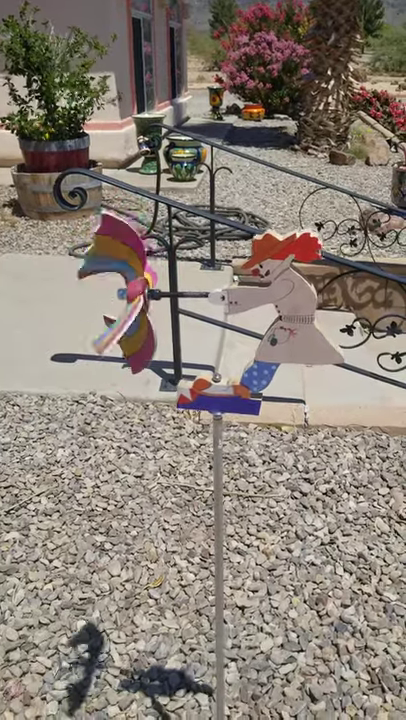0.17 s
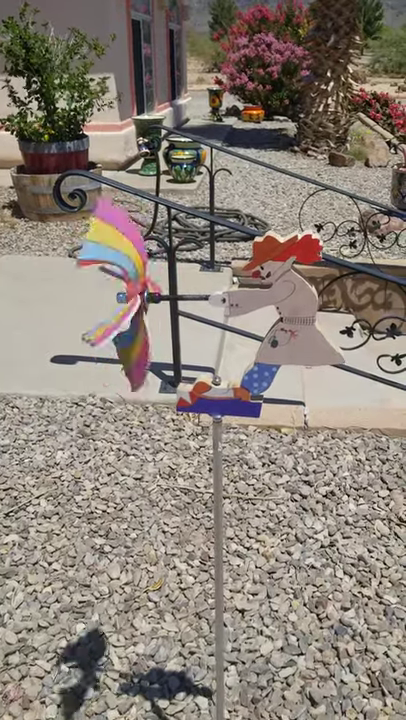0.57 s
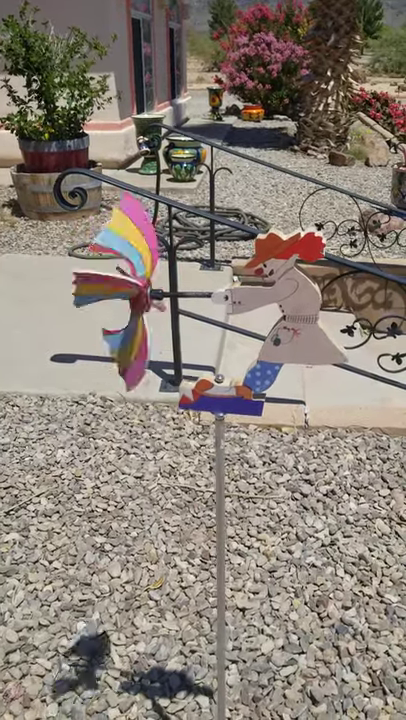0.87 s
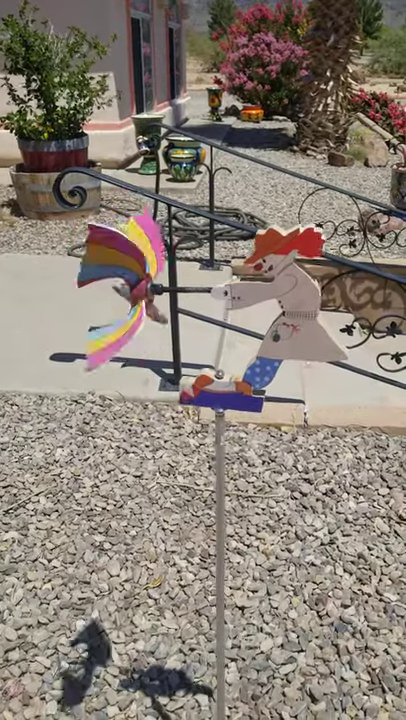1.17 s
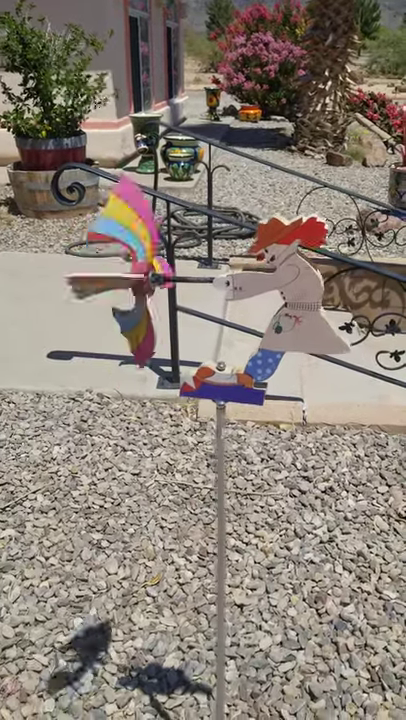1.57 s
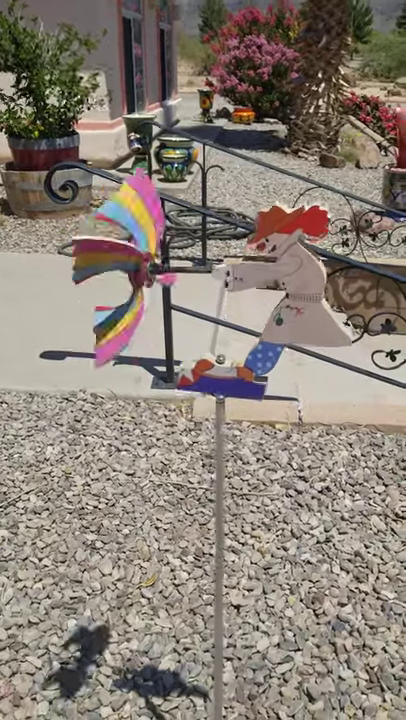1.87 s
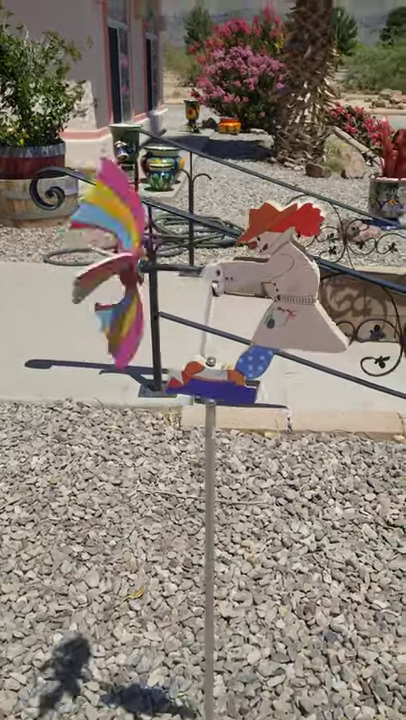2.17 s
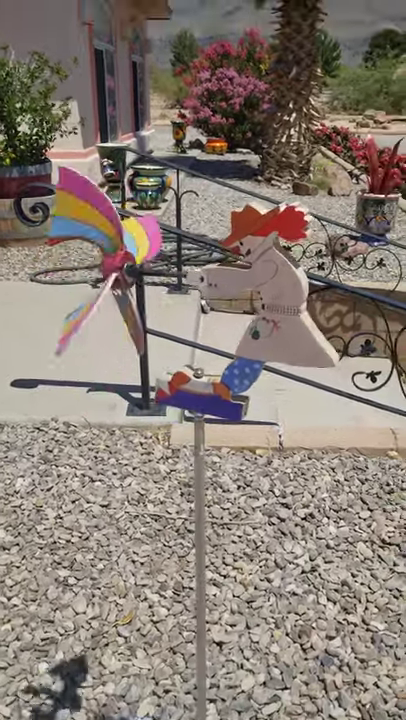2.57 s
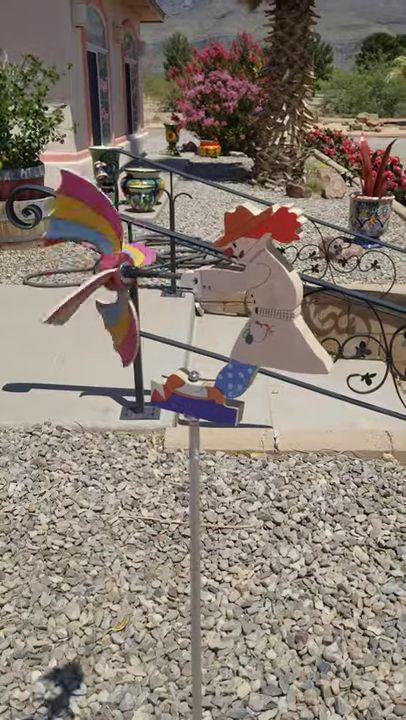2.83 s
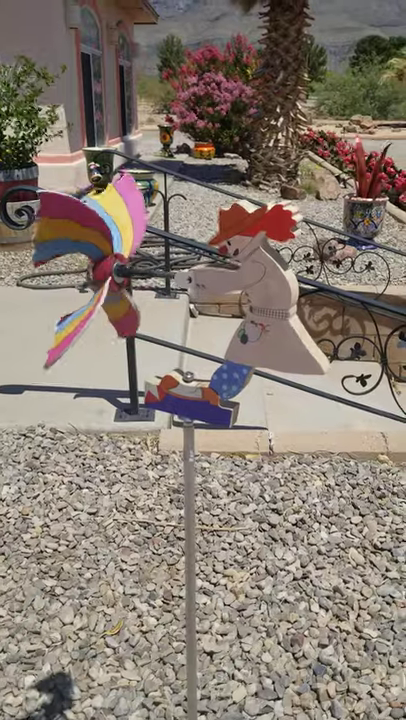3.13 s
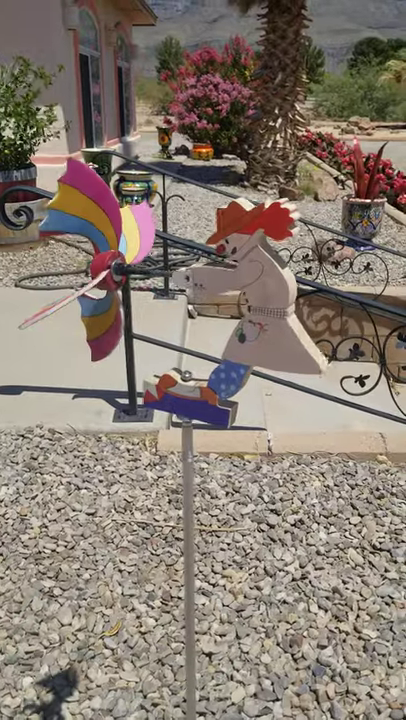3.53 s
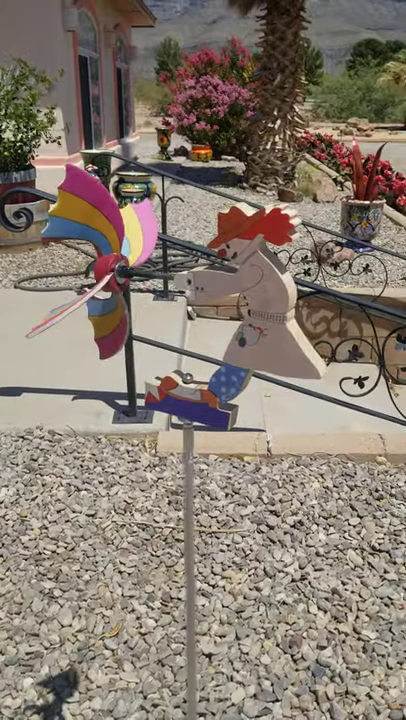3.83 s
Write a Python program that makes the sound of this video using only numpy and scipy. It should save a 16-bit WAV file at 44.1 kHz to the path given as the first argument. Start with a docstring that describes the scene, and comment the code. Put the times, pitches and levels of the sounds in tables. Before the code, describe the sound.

Wind rumbles and thumps on the microphone in a yard, easing near the end. Close by, a wooden garden spinner turns with faint rubs, ticks, brief squeaks and a couple of dry knocks, over a soft distant rush.

```python
"""Garden spinner in a windy gravel yard

Wind buffets both ports of the microphone, then drops away on the left. Close by, a wooden
spinner turns: its figure rubs and knocks, and its wire crank ticks and squeaks. Soft hollow
whirrs come and go, and far behind a rush swells and fades over steady air."""
import sys
import numpy as np
from scipy import signal
from scipy.fft import rfft, irfft
from scipy.io import wavfile

SR = 44100
rng = np.random.default_rng(int(sys.argv[2]) if len(sys.argv) > 2 else 0)


def waveform_to_disk(signal):
    """Save audio, clipped to [-1, 1], as 16-bit WAV at the path in sys.argv[1]."""
    frames = np.transpose(np.atleast_2d(signal))
    scaled = np.clip(frames, -1, 1) * 32767
    samples = np.round(scaled).astype(np.int16)
    wavfile.write(sys.argv[1], SR, samples)


N = 176400
HZ, TIME = np.fft.rfftfreq(N, 1 / SR), np.arange(N) / SR


def amp(db):
    """Decibels to gain."""
    return 10 ** (np.asarray(db) / 20)


def unit(x):
    """Scales to an rms of one."""
    return x / np.sqrt(np.mean(x ** 2) + 1e-20)


def across(points, column=1):
    """Reads a table along a log-frequency axis."""
    table = np.array(points)
    return np.interp(np.log(HZ + 1), np.log(table[:, 0]), table[:, column])


def add(mix, start_s, sound):
    """Mixes a sound in at a time, dropping what falls outside."""
    at = round(start_s * SR)
    sound = sound[..., max(-at, 0):]
    part = mix[..., max(at, 0):][..., :sound.shape[-1]]
    part += sound[..., :part.shape[-1]]


def band(hz, octaves, size=N):
    """Noise in a bell-shaped band."""
    f = np.fft.rfftfreq(size, 1 / SR) + 1
    bell = np.exp(-.5 * (np.log2(f / hz) / octaves) ** 2)
    return unit(irfft(rfft(rng.standard_normal(size)) * bell, size))


def wander(hz):
    """Smooth random motion up to about this rate."""
    return unit(irfft(rfft(rng.standard_normal(N)) / (1 + (HZ / hz) ** 4), N))


def ring(modes):
    """Decaying modes of a struck object."""
    t = np.arange(SR // 5) / SR
    return sum(amp(db) * np.exp(-np.log(1000) * t / t60) * np.sin(2 * np.pi * hz * t)
               for hz, db, t60 in modes)


def yard(x, wet_db, t60=0.22):
    """Short scatter from gravel and walls, different at each port."""
    t = np.arange(SR // 3) / SR
    tail = rng.standard_normal((2, len(t))) * np.exp(-np.log(1000) * t / t60)
    return amp(wet_db) * signal.fftconvolve(x[None], tail / np.linalg.norm(tail[0]), axes=1)[:, :N]


def wind(full_gust_db=-30):
    """Turbulence right on the ports: lumpy eddies, the smaller mostly growing faster with the gust."""
    # Wind strength at each port. Each row: time in seconds, strength in dB.
    left = [(0.0, -30), (0.34, -34.5), (0.42, -35.5), (0.55, -40), (0.59, -29.5), (1.02, -29.5),
            (1.11, -33.5), (1.19, -27), (1.26, -40), (1.39, -32), (1.42, -36.5), (1.86, -31), (2.05, -32),
            (2.09, -25.5), (2.15, -29.5), (2.35, -29), (2.42, -42.5), (2.45, -33), (2.61, -35), (2.68, -62),
            (2.7, -36.5), (2.8, -33.5), (2.89, -78), (2.99, -31), (3.05, -51.5), (3.22, -83), (3.3, -47),
            (3.33, -71), (3.46, -83), (3.49, -55), (3.82, -76), (3.84, -44), (3.93, -74), (3.97, -46),
            (4.0, -36)]
    right = [(0.0, -39), (0.06, -26), (0.12, -41), (0.32, -31), (0.42, -34), (0.75, -32), (1.24, -33.5),
             (1.47, -34.5), (1.61, -33), (1.64, -38), (1.72, -33.5), (1.89, -30.5), (1.97, -36),
             (2.05, -33), (2.11, -31), (2.5, -32.5), (2.56, -42), (2.68, -41), (2.78, -35.5), (2.85, -45),
             (2.95, -39.5), (3.09, -40), (3.12, -48), (3.33, -35.5), (3.37, -47.5), (3.58, -35),
             (3.81, -43), (3.85, -35), (3.9, -40.5), (4.0, -38)]
    # Eddies by size. Each row: centre in Hz, level in a full gust in dB,
    # growth in dB per dB of wind (held to at least 0.5), lumpiness in dB.
    eddies = [(24.3, -81, -5, -7), (59.2, -33, 1.13, 7), (99, -32, 2, 7.5), (204, -37.5, 2.17, 2.5),
              (323.6, -38, 2.25, 8), (606, -56, 0.9, 5)]
    out = np.zeros((2, N))
    for port, strength in zip(out, (left, right)):
        gust_db = np.interp(TIME, *np.transpose(strength)) - full_gust_db
        lumps = 2 * np.tanh(wander(hz=52.7) / 2)
        for hz, db, growth, lumpy_db in eddies:
            eddy = unit(band(hz, octaves=0.48) * amp(lumpy_db * lumps))
            port += amp(db + max(growth, .5) * gust_db) * eddy
    return out


def distant(colour_db):
    """Coloured noise from far off, partly shared by the two ports in the low mids."""
    # Likeness of the ports. Each row: frequency in Hz, correlation from 0 to 1.
    likeness = [(100, 0), (600, 0.82), (1150, 0.45), (1800, 0), (3000, 0), (16000, 0)]
    same = across(likeness)
    left, separate = rfft(rng.standard_normal((2, N)))
    right = same * left + np.sqrt(1 - same ** 2) * separate
    return unit(irfft(np.array([left, right]) * amp(colour_db), N))


def rush(waver_db=.7):
    """A far rush with hollow resonances swells and fades, a little to the right."""
    # The swell. Each row: time in seconds, gain in dB.
    swell = [(0, -58), (.15, -57), (.55, -52), (.72, -51.5), (1.1, -54), (1.5, -51), (1.7, -47),
             (2.2, -46.5), (2.5, -46), (2.65, -49), (2.72, -53), (2.8, -48), (2.95, -53), (3.2, -55.5),
             (3.45, -52), (3.8, -47.5), (4, -53)]
    # The spectrum. Each row: frequency in Hz, relative density in dB.
    colour = [(100, -25), (300, 5.5), (420, 7), (600, 0), (800, 4.5), (950, 4.5), (1120, 6.5), (1350, 5),
              (1650, -1), (1950, -9), (2330, -16), (2800, -15.5), (3300, -18), (6000, -25.5)]
    # Resonances. Each row: centre in Hz, width in octaves, relative level in dB.
    hollows = [(368, 0.046, -13), (932, 0.037, -14.5), (1092, 0.071, -11.5), (1165, 0.038, -20)]
    broad = amp(-4) * distant(across(colour))
    hollow = sum(amp(db) * band(hz, octaves) for hz, octaves, db in hollows)
    gain_db = np.interp(TIME, *np.transpose(swell)) + waver_db * wander(hz=9)
    return (broad + hollow) * amp(gain_db) * amp([[-.7], [.7]])


def air(level_db=-55):
    """Still air and hiss, steady at both ports."""
    # Each row: frequency in Hz, relative density on the left and on the right in dB.
    colour = [(30, -23, 0), (211, -8.5, -40), (383, 10, -28), (556, 3.5, -1.5), (1090, 0.5, 1),
              (1530, -6, -7.5), (1930, -7.5, -8.5), (2300, -14.5, -13.5), (2800, -10, -10),
              (3430, -7.5, -6.5), (4060, -9, -11), (5260, -7.5, -6.5), (6850, -9, -13), (8940, -14, -56),
              (10050, -11.5, -22.5), (12900, -9, -18.5), (15600, -14.5, -25)]
    return amp(level_db) * distant(np.array([across(colour), across(colour, 2)]))


def rasp(hz, wobble, flutter, grit, rough_db=6):
    """A gritty friction tone, unsteady in pitch and strength."""
    start = rng.integers(N // 2)
    part = slice(start, start + len(hz))
    tone = np.exp(2j * np.pi * np.cumsum(hz * (1 + wobble[part])) / SR)
    return unit(amp(rough_db * flutter[part]) * ((1 + grit[part]) * tone).real)


def squeaks(breakup_db=7, chirp_fall=0.136, chirp_fade_db=-9, upper_ratio=1.4):
    """Long squeaks that break up as they fall, and short chirps, likely from the dry bearing."""
    # One squeak for each turn. Each row: start in seconds, relative level in dB.
    turns = [(-.037, -56.5), (1.505, -53.5), (2.963, -54)]
    # Course of a squeak. Each row: seconds from its start, pitch in Hz, gain in dB.
    course = [(-.004, 4600, -18), (.003, 4800, 5), (0.012, 5200, 1.5), (0.03, 4750, 9), (0.042, 4000, 4),
              (0.063, 3650, 0.5), (.078, 3300, -1), (0.1, 3050, -1), (.114, 2800, -16)]
    # Rasping chirps. Each row: start and length in seconds, relative level in dB,
    # starting pitch in Hz, upper partial against the lower in dB.
    chirps = [(0.87, 0.043, -51, 3050, -6), (1.706, 0.027, -44, 3264, -11.5),
              (2.093, 0.055, -58, 3450, -18), (2.417, .012, -59, 3510, -18),
              (3.418, 0.02, -55.5, 2960, -27)]
    out, flutter = np.zeros((2, N)), wander(hz=129)
    wobble = 0.0436 * wander(hz=660) + 0.0304 * wander(hz=64.3)
    grit = .5 * (wander(hz=400) + 1j * wander(hz=400))
    grip = np.tanh(2 * wander(hz=65))
    at, hz, course_db = np.transpose(course)
    t = np.arange(0, at[-1], 1 / SR)
    for port in out:
        for start, db in turns:
            breaks = unit(amp(breakup_db * t / at[-1] * np.interp(start + t, TIME, grip)))
            tone = rasp(np.interp(t, at, hz), wobble, flutter, grit)
            add(port, start, amp(db + np.interp(t, at, course_db)) * breaks * tone)
        for start, length, db, top_hz, upper_db in chirps:
            progress = np.arange(0, length, 1 / SR) / length
            pitch = top_hz * (1 - chirp_fall * progress)
            lower = rasp(pitch, wobble / 2, flutter, grit / 2)
            upper = amp(upper_db) * rasp(pitch * upper_ratio, wobble, flutter, grit)
            scrape = amp(-2) * band(hz=3730, octaves=0.69, size=8192)[:len(pitch)]
            envelope = amp(db + chirp_fade_db * progress) * signal.windows.tukey(len(pitch), .05)
            add(port, start, envelope * (lower + upper + scrape))
    return amp(-2.5) * (out + yard(out.mean(0), wet_db=-0.5))


def wood(contact_t60, crack=4.9):
    """The ring of the wooden figure, damped by whatever touches it."""
    # Each row: mode frequency in Hz, relative level in dB, free t60 in seconds.
    modes = [(610, 14.5, 0.019), (830, 11.5, 0.017), (1014, 11, 0.055), (1158, 17.5, 0.012),
             (1320, 5.5, 0.016), (1515, 6.5, 0.055), (1662, 3.5, 0.1), (2060, -22, 0.015),
             (2540, 8, 0.0046), (3080, 0.5, 0.0078), (4010, 3, 0.0081)]
    body = ring([(hz, db, 1 / (1 / t60 + 1 / contact_t60)) for hz, db, t60 in modes])
    body[0] += crack
    return body


def rubs(slips_per_s=2000, swell_share=0.34, fade_db=-10):
    """The figure drags: small slips swell and fade, each ringing the wood."""
    # Each row: start and length in seconds, level in dB, t60 the contact allows in seconds.
    scuffs = [(0.024, 0.03, -48.5, 0.019), (0.374, 0.037, -45, 0.03), (0.799, 0.032, -49, 0.027),
              (0.865, 0.034, -49.5, 0.014), (1.167, 0.039, -51, 0.049), (1.244, 0.017, -50, 0.032),
              (1.396, 0.031, -46.5, 0.017), (2.442, 0.099, -49, 0.06), (2.762, 0.061, -50, 0.048),
              (3.646, 0.021, -45, 0.013), (3.657, 0.057, -49.5, 0.003)]
    out = np.zeros(N)
    for start, length, db, contact_t60 in scuffs:
        n = int(length * SR)
        force, chance = rng.standard_normal(SR // 5)[:n], rng.random(SR // 5)[:n]
        slips = force * (chance < slips_per_s / SR)
        progress = np.arange(n) / (length * SR)
        envelope = np.minimum(progress / swell_share, 1) * amp(fade_db * progress)
        sound = signal.fftconvolve(slips * envelope, wood(contact_t60))
        add(out, start, amp(db) * sound / np.std(sound[:n]))
    return out


def thumps(width_s=0.0034):
    """Single eddies hit the ports, each a few irregular cycles of pressure."""
    # Each row: time of the peak in seconds, left and right level in dB, centre in Hz.
    hits = [(0.027, -45, -34.5, 373), (0.045, -25, -21.5, 105), (0.072, -36, -31.5, 387),
            (.186, -40, -32, 368), (0.211, -31, -27.5, 300), (0.311, -30.5, -25.5, 303),
            (.482, -35, -37, 414), (.598, -23, -30, 85.5), (.635, -49, -25.5, 148), (.735, -24, -30, 77.5),
            (0.764, -23.5, -24, 443), (.778, -27.5, -28, 427), (.808, -29.5, -27, 500),
            (0.821, -29, -31, 397), (.858, -30, -28.5, 425), (.884, -27, -31, 260),
            (0.922, -21.5, -21.5, 300), (0.935, -28, -25.5, 210), (.947, -25, -26, 354),
            (0.968, -24.5, -30.5, 413), (1.006, -21, -21, 148), (1.026, -24, -27.5, 323),
            (1.172, -32, -24, 318), (1.274, -29, -33, 307), (1.381, -28, -24.5, 79.2),
            (1.573, -37, -39, 510), (1.585, -32, -31, 420), (1.621, -37, -38.5, 520), (1.646, -32, -29, 80),
            (1.699, -28, -33, 346), (1.798, -20, -23, 383), (1.832, -34, -33, 172), (1.857, -30, -27, 91),
            (1.901, -27, -24, 130), (2.079, -23, -26, 168), (2.104, -44, -42, 420),
            (2.123, -26.5, -26, 363), (2.144, -18, -21.5, 139), (2.162, -28.5, -27, 410),
            (2.208, -32, -29, 295), (2.228, -29, -26, 262), (2.246, -27, -25, 433), (2.26, -23, -24.5, 187),
            (2.295, -27, -24.5, 372), (2.316, -22, -26.5, 304), (2.452, -34.5, -42, 382),
            (2.738, -55, -35, 315), (2.814, -31, -35.5, 109), (3.302, -37, -69, 430),
            (3.498, -34, -67, 390), (3.528, -30, -49, 450)]
    out, t = np.zeros((2, N)), np.arange(-1024, 1024) / SR
    shape = 1 / np.cosh(t / width_s)
    for peak, left_db, right_db, hz in hits:
        for port, db in zip(out, (left_db, right_db)):
            puff = band(hz, octaves=0.43, size=len(t)) * shape
            add(port, peak + t[0], amp(db) * puff * np.linalg.norm(shape) / np.linalg.norm(puff))
    return out


def ticks(snap_decay_s=0.0042):
    """The crank catches: a bright snap, louder on the left, and a short ring of wire."""
    # Each row: start in seconds, gain of the ring in dB, level of the snap on the left in dB.
    catches = [(.078, -70, -70), (.093, -65, -70), (.277, -69, -54), (.495, -44, -46), (.584, -58, -55),
               (.898, -51, -56), (1.013, -54, -53), (1.036, -61, -70), (1.096, -55, -54), (1.16, -54, -57),
               (1.618, -55, -53), (1.708, -63, -64), (1.719, -48, -58), (1.797, -73, -58),
               (1.901, -56, -62), (1.926, -50, -48), (1.968, -52, -56), (1.973, -45.5, -51),
               (2.815, -51.5, -49), (2.834, -59, -50), (2.909, -54, -44.5), (2.914, -53, -50)]
    # Each row: mode frequency in Hz, relative level in dB, t60 in seconds.
    wire_modes = [(2940, -9, 0.02), (4820, -15, .018), (4950, 1.5, 0.026), (13100, -10, .015)]
    rings, snaps, wire = np.zeros(N), np.zeros((2, N)), ring(wire_modes)
    fade = np.exp(-np.arange(2048) / SR / snap_decay_s)
    for start, ring_db, snap_db in catches:
        add(rings, start, amp(ring_db) * wire)
        for port, side_db in zip(snaps, (0, -3)):
            add(port, start, amp(snap_db + side_db) * fade * band(hz=7400, octaves=1, size=len(fade)))
    return rings + snaps + yard(rings, wet_db=-10)


def whirrs(sag=0.0725, width_hz=38):
    """Soft, fuzzy, hollow tones swell and sag in pitch."""
    # Each row: start and length in seconds, level in dB, starting pitch in Hz.
    swells = [(0.203, 0.53, -59, 1095), (2.003, 0.31, -53.5, 1099), (2.47, 0.283, -55.5, 1185)]
    out = np.zeros(N)
    for start, length, db, hz in swells:
        progress = np.arange(0, length, 1 / SR) / length
        pitch = hz * (1 - sag * progress)
        fuzz = (wander(width_hz) + 1j * wander(width_hz))[:len(pitch)]
        tone = (fuzz * np.exp(2j * np.pi * np.cumsum(pitch) / SR)).real
        add(out, start, amp(db) * unit(tone) * signal.windows.tukey(len(tone), .5))
    return out


def knocks(contact_s=0.00011, chatter_s=0.0025):
    """Dry clacks of the figure: a blow with a moment of chatter in the loose joint."""
    # Each row: start in seconds, level in dB, t60 the contact allows in seconds.
    clacks = [(1.1703, -34.5, .4), (1.176, -49, 0.023), (1.1826, -37.5, 0.075), (1.1955, -50, .04),
              (1.4033, -40.5, 0.035), (1.4176, -46, 0.018)]
    out, t = np.zeros(N), np.arange(SR // 100) / SR
    blow = np.exp(-t / contact_s)
    blow /= np.linalg.norm(blow)
    for start, db, contact_t60 in clacks:
        chatter = 0.34 * rng.standard_normal(len(t)) * np.exp(-t / chatter_s)
        sound = signal.fftconvolve(blow + chatter, wood(contact_t60))
        add(out, start, amp(db) * sound / np.std(sound[:len(t)]))
    return out


def figure(lag_s=.00007):
    """Close rubs and knocks reach the right port a little later and scatter in the yard."""
    left = rubs() + knocks()
    right = irfft(rfft(left) * np.exp(-2j * np.pi * HZ * lag_s), N)
    return np.array([left, right]) + yard(left, wet_db=-3)


def scene():
    """Wind on the microphone, the spinner close by, the rush and the air behind."""
    return wind() + thumps() + figure() + ticks() + squeaks() + whirrs() + rush() + air()


def record(dry):
    """The recorder's band limit takes off the highest treble."""
    edge_hz = 15850
    lowpass = signal.firwin(511, edge_hz, window=("kaiser", 9), fs=SR)
    return signal.oaconvolve(dry, lowpass[None], "same")


dry = scene()
out = record(dry)
waveform_to_disk(out)
```